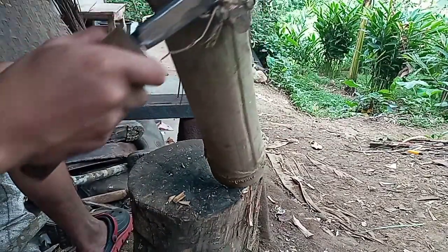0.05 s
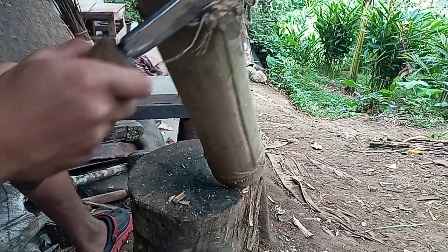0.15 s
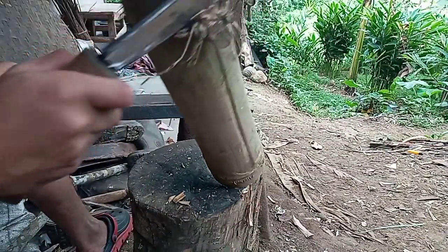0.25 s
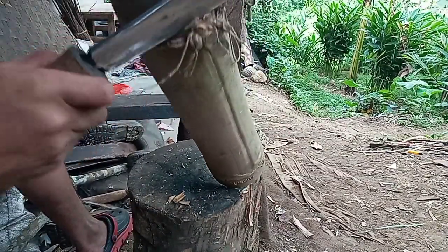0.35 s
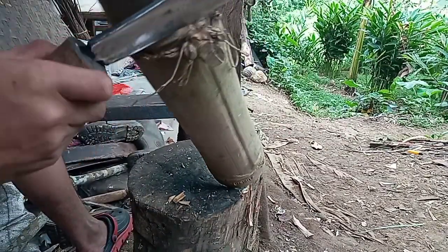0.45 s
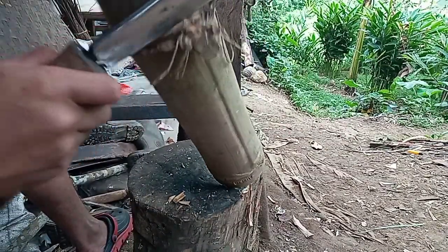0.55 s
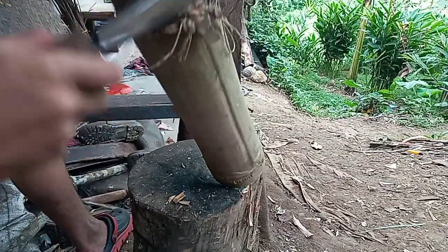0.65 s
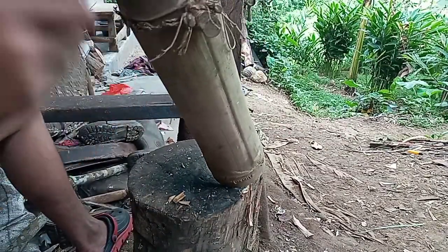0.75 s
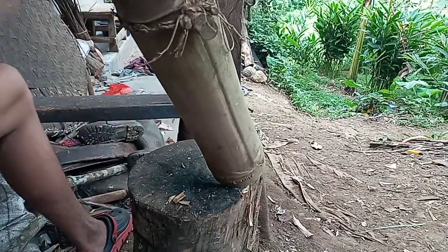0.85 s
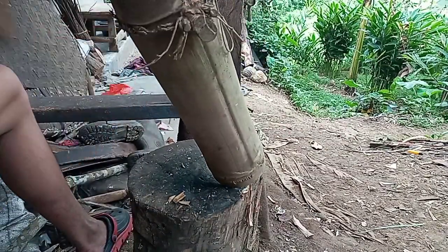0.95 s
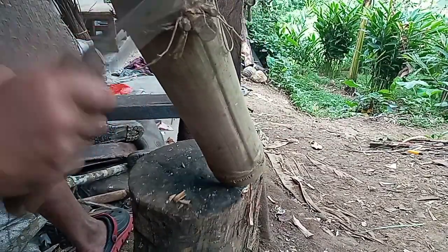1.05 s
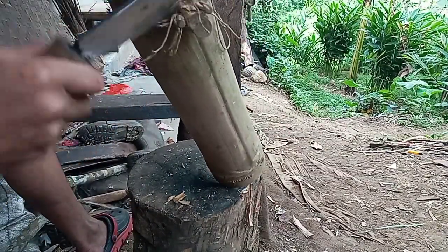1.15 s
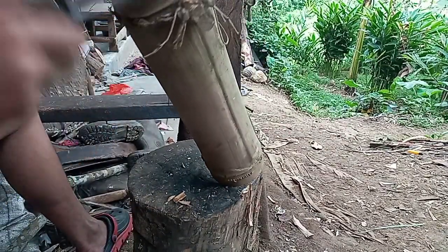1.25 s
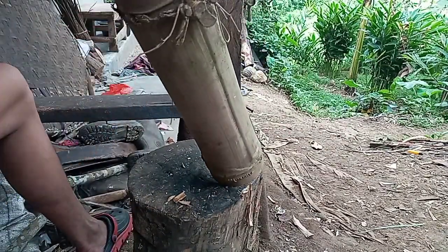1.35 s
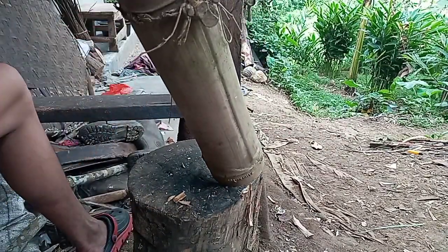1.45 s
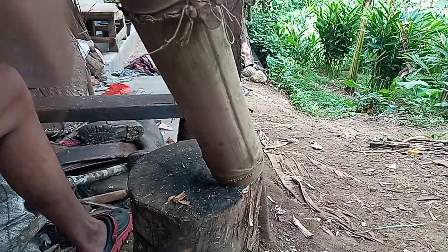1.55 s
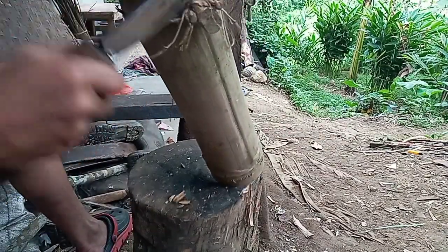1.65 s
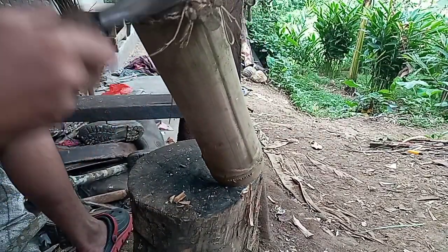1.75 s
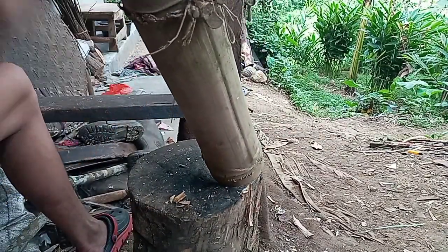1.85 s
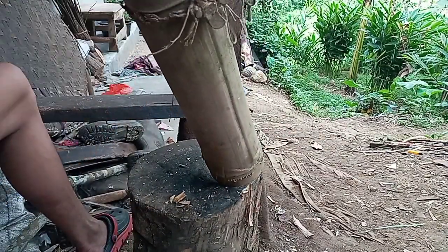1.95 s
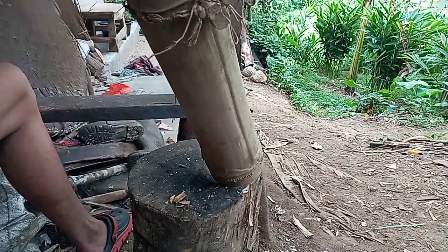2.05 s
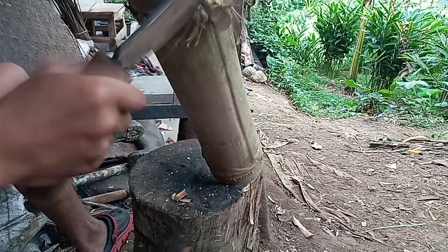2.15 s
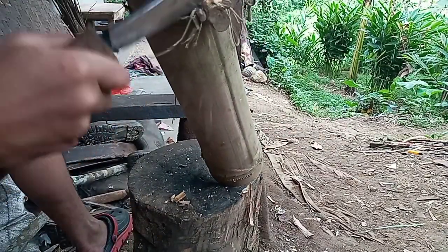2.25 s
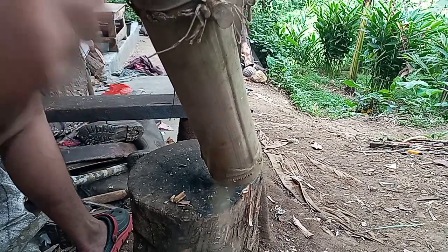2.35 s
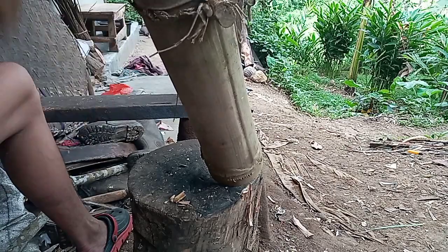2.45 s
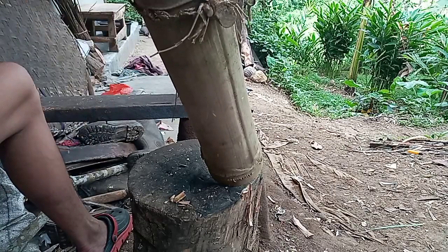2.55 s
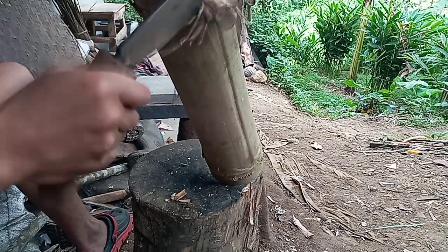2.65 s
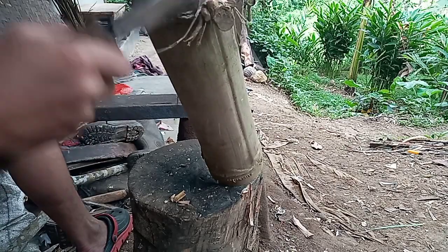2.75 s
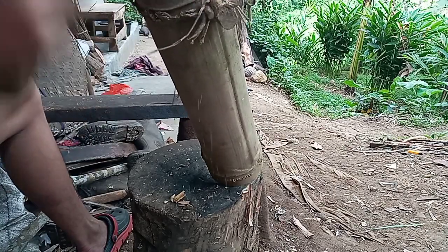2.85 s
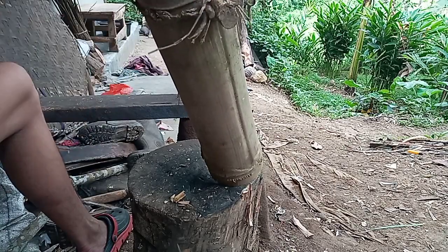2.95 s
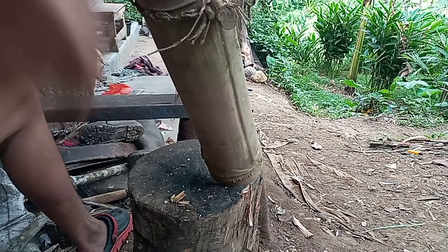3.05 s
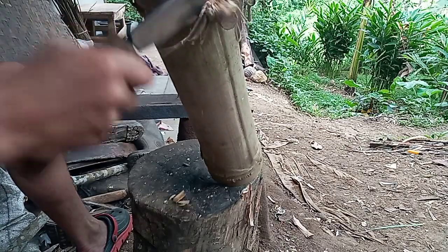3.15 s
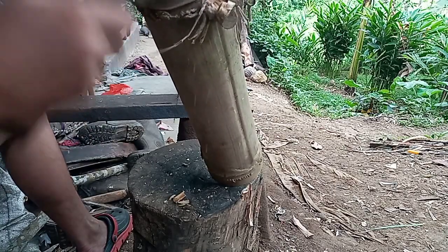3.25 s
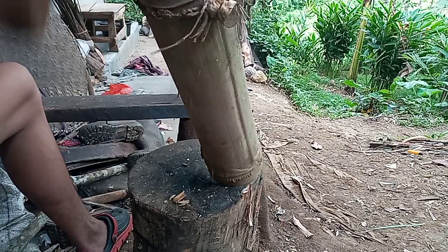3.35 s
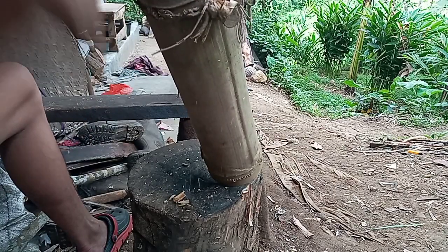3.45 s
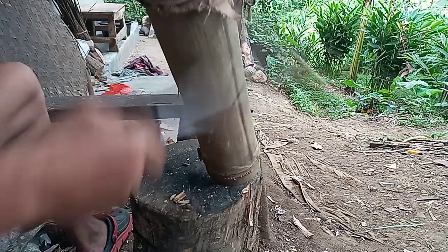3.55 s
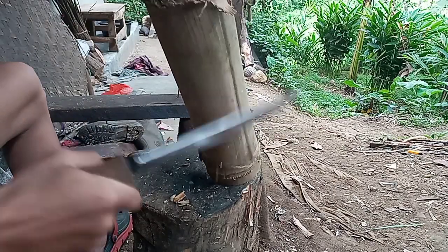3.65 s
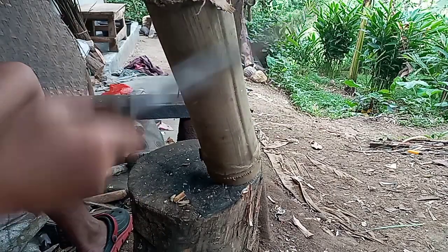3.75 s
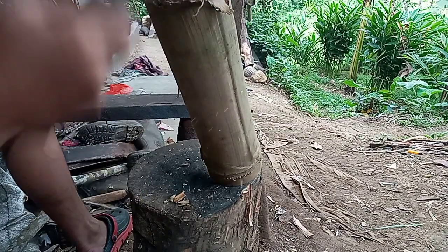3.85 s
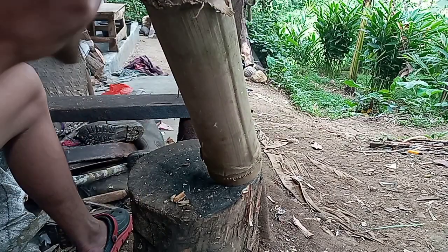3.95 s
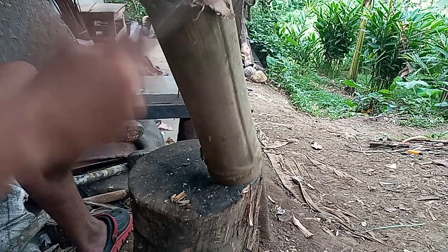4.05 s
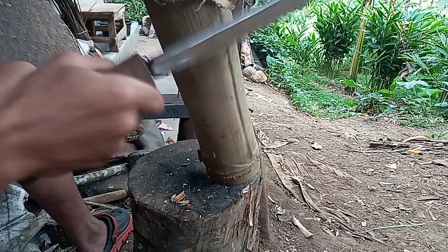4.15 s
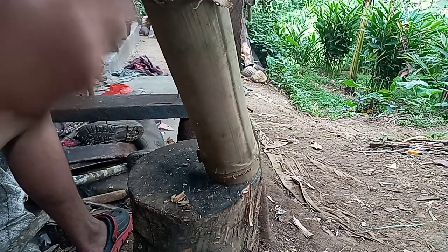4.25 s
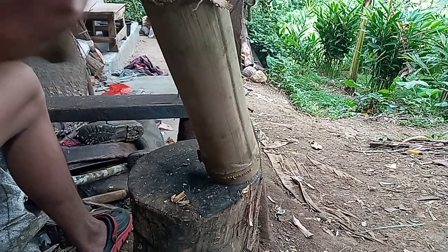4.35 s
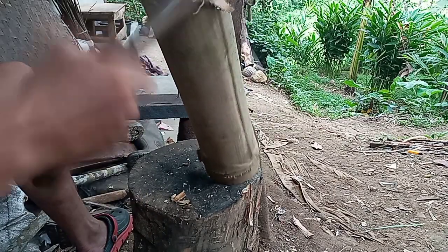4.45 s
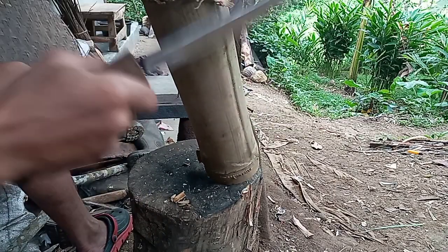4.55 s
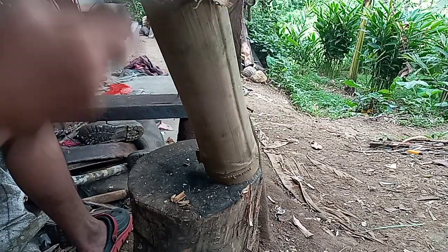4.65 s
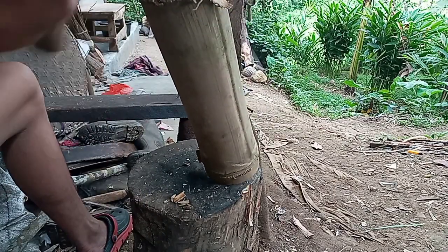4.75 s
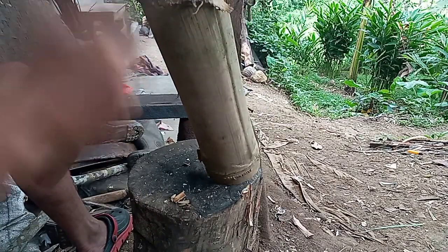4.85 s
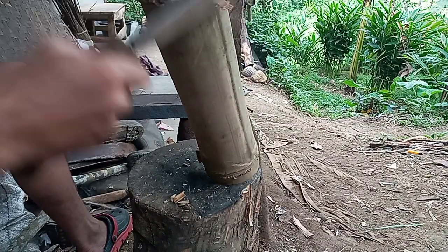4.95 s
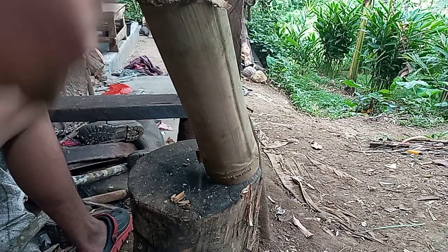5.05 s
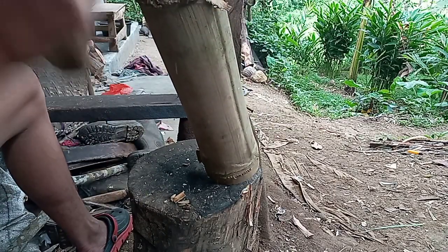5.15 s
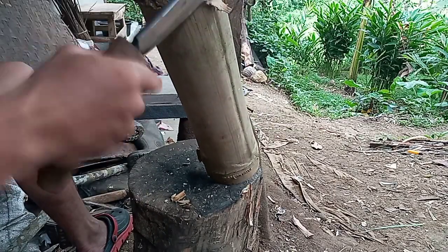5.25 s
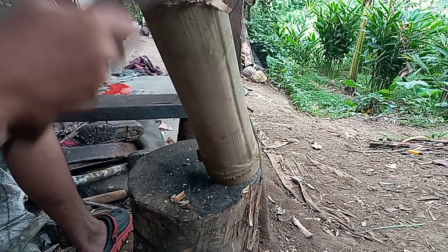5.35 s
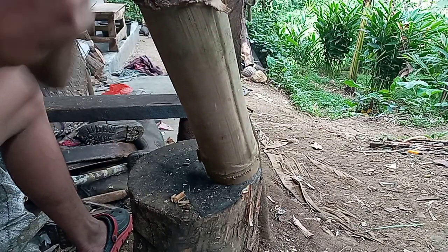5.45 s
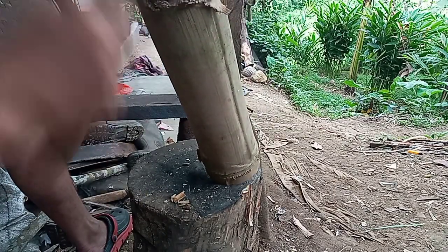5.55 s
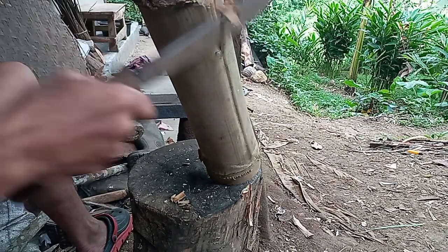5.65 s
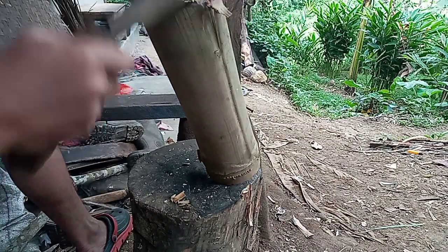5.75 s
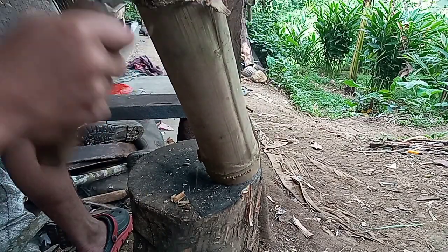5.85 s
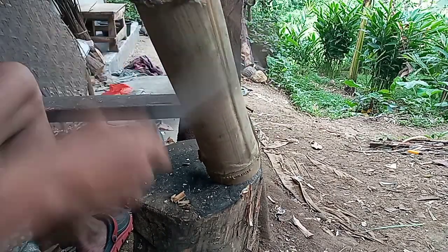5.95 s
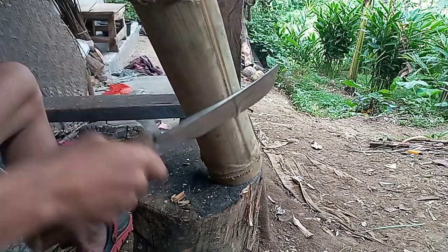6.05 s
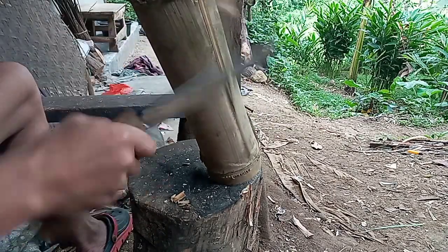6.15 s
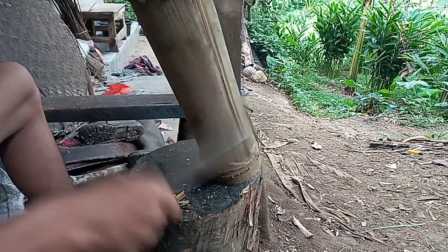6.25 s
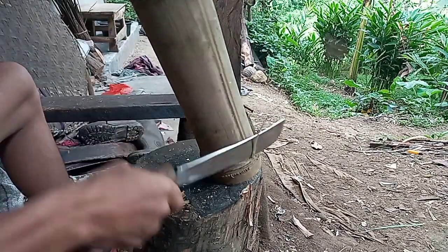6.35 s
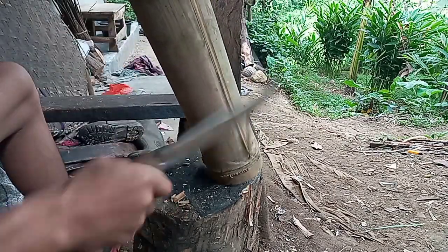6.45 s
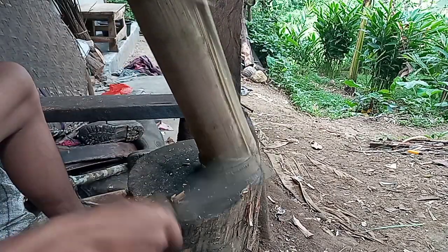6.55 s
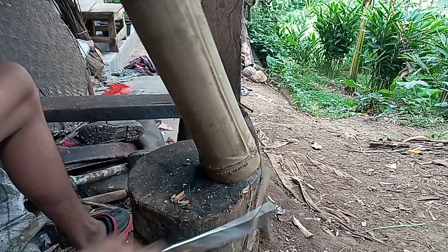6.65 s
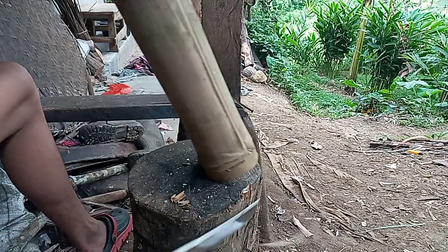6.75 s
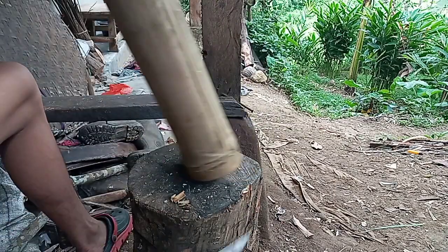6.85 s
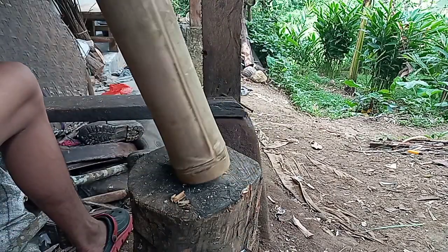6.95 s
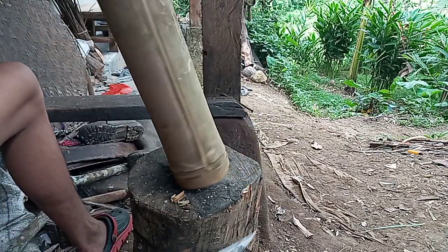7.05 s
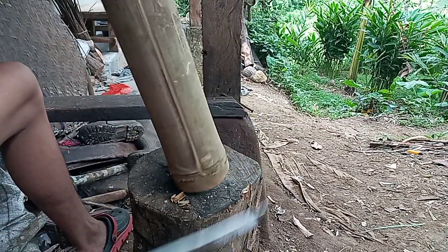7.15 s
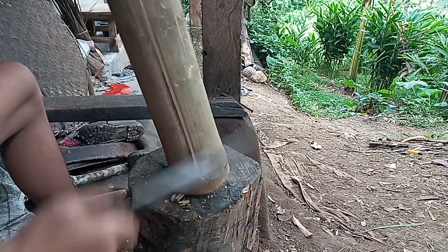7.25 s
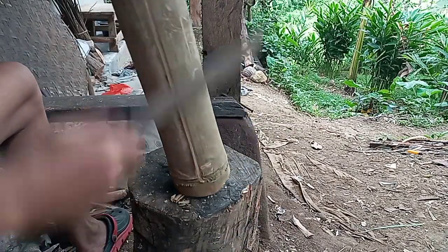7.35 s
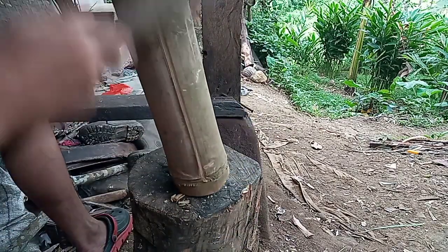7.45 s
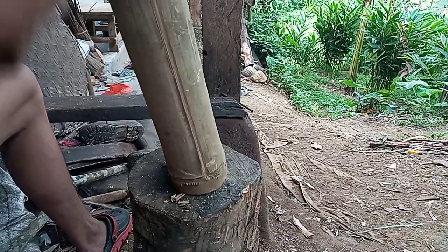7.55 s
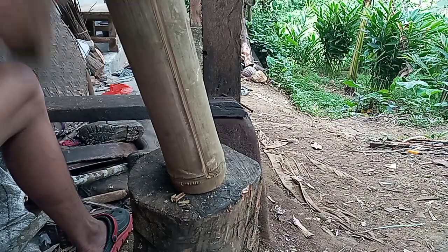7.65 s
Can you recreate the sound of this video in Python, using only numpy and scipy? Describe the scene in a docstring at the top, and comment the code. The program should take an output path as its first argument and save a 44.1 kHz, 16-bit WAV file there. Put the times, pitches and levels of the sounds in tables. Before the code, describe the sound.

A small motorbike putters past at a distance as a blade rasps faintly along bamboo. From about one second, hard chops land roughly every half second, each a bright crack with a short hollow knock and snapping fibres. Chips tick between them. Near the end the blows weaken into taps and scraping. Close stereo microphones outdoors beside an open shed, with short faint echoes and steady insect hiss.

```python
"""First a small motorbike and hissing insects, then a machete chopping into hollow bamboo close by.
The stalk stands on a stump beside an open shed: each blow drives its modes and snaps fibres, strokes rasp along it
and chips tick. Shed and trees answer with scattered noise echoes. The bike, multiples of its firing rate, drones away;
insects, thin far calls, hum and leaves are filtered noise. Two microphones of unlike colour hear it all."""
import sys
import numpy as np
from scipy import signal
from scipy.fft import rfft, irfft
from scipy.io import wavfile

SR = 44100
rng = np.random.default_rng(int(sys.argv[2]) if len(sys.argv) > 2 else 0)


def transcribe(signal):
    """Save signal, clipped to [-1, 1], as a 16-bit WAV file at the path in sys.argv[1]."""
    frames = np.atleast_2d(signal).T
    limited = np.clip(frames, -1, 1)
    pcm = np.round(limited * 32767).astype(np.int16)
    wavfile.write(sys.argv[1], SR, pcm)


def gain_from_db(level_db):
    """Convert decibel levels to linear amplitude factors (20 dB per decade)."""
    decades = np.asarray(level_db, float) / 20
    return 10 ** decades


N = 340011

# Close: blade meets stalk [t/s, crack level/dB, then level/dB of air column, wall, low fibre, high fibre]
BLOWS = [(0.209, -41.5, -70, -49, -29, -45), (1.0716, -9, -20, -15, -17, -15),
         (1.1185, -19.5, -35.5, -52, -35.5, -35.5), (1.6185, -3, -14.5, -16.5, -17, -10),
         (2.137, -1.5, -31.5, -21, -10, -9), (2.6418, -1, -15, -10, -17.5, -23),
         (3.0849, -13.5, -51.5, -15, -20, -18.5), (3.1014, -4, -18.5, -10, -14.5, -17.5),
         (3.528, -4, -26.5, -18, -15, -15.5), (3.809, -20, -54, -41, -37, -42.5),
         (4.0846, -3, -23.5, -24.5, -20, -16), (4.4823, -6, -39, -25.5, -23.5, -14.5),
         (4.874, -1, -18.5, -13.5, -14.5, -12), (5.24, 0, -20, -14.5, -13.5, -10.5),
         (5.5883, -3, -31.5, -20, -19, -14), (5.913, -10.5, -29.5, -53, -17, -17.5),
         (5.952, -14.5, -51, -24.5, -27.5, -23.5), (6.266, -20, -68, -28.5, -16, -35),
         (6.3584, -20, -61, -35.5, -36.5, -53), (6.5266, -11.5, -60, -28, -16.5, -35),
         (6.58, -18.5, -44, -28, -50, -55), (6.727, -23.5, -61, -38, -17.5, -75),
         (6.8615, -29.5, -45, -35.5, -31, -59)]
# Where air column, wall, low fibre, high fibre and crack strengths of a blow apply [f/Hz]
STRIKE_HZ = [620, 1125, 1650, 2550, 5500]
# Ringing modes of the stalk [f/Hz, level/dB, t60/s]
STALK_MODES = [(623, -1, .11), (850, -10, .04), (985, -8, .04), (1123, 0, .055), (1320, -8, .035),
               (1590, -2, .032), (1812, -2, .04), (1900, -4, .035), (2120, -1, .04), (2430, -2, .035),
               (2580, -2, .035), (2761, -1, .045), (2950, -3, .035)]
# Spectrum of snapping fibres [f/Hz, level/dB per Hz]
CRACK_SPECTRUM = [(1470, -29), (2500, 11), (2880, 2), (3320, 4.5), (4400, 4), (5790, -1), (6890, 8),
                  (8120, -8), (10500, -3.5), (13000, -18), (15200, -12.5), (16300, -41)]
# Blade and hand sliding on the stalk [start t/s, length/s, then level/dB of rasp, wall ring, fibre ring]
STROKES = [(0.0, .1, -44.5, -52, -53), (0.201, .38, -41, -63, -42), (0.586, 0.1, -44, -63, -52),
           (0.707, 0.087, -43, -75, -48.5), (1.021, .09, -54, -75, -51.5), (2.13, 0.022, -33.5, -80, -59.5),
           (2.486, 0.19, -53, -79.5, -63.5), (3.385, 0.099, -51, -85, -72), (3.761, 0.06, -46, -58, -45),
           (3.843, 0.055, -33, -77, -36), (3.92, .16, -53, -85, -68), (4.074, 0.049, -39.5, -79.5, -53),
           (5.572, 0.036, -38, -80, -52), (5.924, .08, -36.5, -41, -37), (5.996, 0.041, -26.5, -64, -46),
           (6.135, 0.14, -38, -46, -49), (6.27, 0.053, -31.5, -33.5, -39.5), (6.292, 0.05, -30, -50, -45.5),
           (6.358, 0.038, -54, -64, -77), (6.57, 0.086, -32.5, -39, -40), (6.726, .04, -47, -80, -34),
           (6.76, .16, -37.5, -80, -55), (6.828, .12, -32.5, -61, -51), (6.88, 0.12, -31, -55, -49.5),
           (6.995, .12, -41.5, -75, -65.5), (7.404, .1, -51.5, -59, -65)]
# Spectrum of the sliding rasp [f/Hz, level/dB per Hz]
RASP_SPECTRUM = [(1180, -39), (2000, -13), (3130, -3), (3480, -4), (4150, -5), (4550, 1), (4950, -8),
                 (5350, -5), (6900, -2), (8300, -9.5), (13700, -16), (15000, -13), (15900, -11.5),
                 (16300, -61)]
# The stalk's foot bumps the stump [f/Hz, level below the crack/dB]
STUMP_MODES = [(112, -32.5), (232, -25.5)]
# Chips and splinters ticking [t/s, level/dB]
TICKS = [(0.412, -30), (0.7348, -34.5), (1.182, -29.5), (1.2069, -29), (1.3804, -37.5), (1.5638, -38.5),
         (2.4949, -33.5), (2.5678, -32.5), (2.913, -36.5), (2.935, -39), (3.0597, -28), (3.1773, -28.5),
         (3.3214, -33), (3.3878, -25.5), (3.4267, -28.5), (3.7949, -31.5), (3.8205, -18), (3.8467, -28),
         (3.8689, -29), (3.9033, -27), (3.9494, -35.5), (4.0221, -29.5), (4.0436, -33), (4.743, -39),
         (4.79, -40), (5.0745, -35), (5.189, -29.5), (5.2948, -21.5), (5.418, -25.5), (5.5528, -24),
         (5.6874, -25.5), (5.7064, -23.5), (5.9394, -25), (5.9753, -19.5), (6.1363, -26), (6.2039, -25.5),
         (6.6784, -27), (6.304, -12), (7.0394, -32), (7.3423, -38.5)]
# Spectrum of one tick [f/Hz, level/dB per Hz]
TICK_SPECTRUM = [(880, -81), (1500, -29.5), (3020, -16), (4830, -12.5), (6520, -2), (8710, -10),
                 (14900, -19.5), (16300, -26.5)]
# Echoes off shed and trees [t after the blow/s, level/dB]
ECHO_DECAY = [(.008, -39), (0.036, -51), (0.091, -54), (.125, -56), (.135, -59), (.2, -68), (0.299, -81),
              (.5, -94.5)]
# Colour of the echoes [f/Hz, level/dB, further loss/(dB per s)]
ECHO_COLOUR = [(270, 8.5, 24.5), (605, -5.5, 72), (800, -8, 43.5), (1500, 4.5, 41.5), (2710, -2, 4),
               (5025, 1.5, -11), (7600, 0, 10), (9890, -7, 194), (14820, 8, 178)]
# Motorbike speed [t/s, firings per s]
BIKE_SPEED = [(0, 27.2), (.2, 27.4), (.57, 29.4), (.78, 30.8), (1.0, 32.6), (1.4, 33.6), (1.47, 31),
              (2.0, 26.8), (2.9, 26.3), (3.3, 29.5), (3.8, 29), (4.1, 30.7), (5.05, 28)]
# How unevenly the motorbike fires [t/s, roughness 0-1]
BIKE_ROUGHNESS = [(0, .06), (1.4, .12), (1.5, .35), (3.1, .6), (5.0, .5), (5.2, .85)]
# Motorbike as it reaches the shed [t/s, level/dB]
BIKE_LEVEL = [(0, -39), (.29, -33), (.62, -37), (1.4, -39.5), (1.5, -45), (2.0, -38.5), (2.8, -44),
              (3.03, -50), (3.2, -36.5), (3.32, -48.5), (3.72, -48), (3.9, -72.5), (4.12, -45.5),
              (4.75, -46.5), (5.0, -38), (5.121, -63), (5.35, -43.5), (5.55, -60.5), (5.85, -79)]
# Response of the exhaust [f/Hz, level/dB]
EXHAUST = [(24, -68.5), (40, -30.5), (106, 3.5), (172, 3.5), (245, -2), (286, -44), (348, -25),
           (391, -21.5), (617, -22.5), (811, -29.5), (900, -28), (1170, -68.5), (1980, -120)]
# Thin far calls [start t/s, end t/s, f/Hz, level/dB]
CHIRRS = [(1.82, 1.9, 3200, -62), (1.88, 1.96, 2960, -62.5), (1.97, 2.07, 900, -76), (1.2, 1.5, 2100, -71),
          (4.3, 4.47, 1600, -74), (7.48, 7.52, 2990, -57.5), (7.55, 7.68, 3010, -60),
          (7.48, 7.7, 2900, -71)]
# Insect choirs all round [f/Hz, width/Hz, level/dB, flicker/dB (taken as 3 at most)]
INSECTS = [(4750, 250, -75, 3), (7200, 700, -65, 4), (10046, 1200, -52.5, 0), (15280, 900, -67, 3)]
# Far hum and leaves [f/Hz, level/dB per Hz]
AIR_SPECTRUM = [(15, -33.5), (25, 2), (97, 5.5), (712, -9.5), (3120, -7), (4090, -8.5), (4630, -2),
                (6700, -9.5), (7210, 7), (8360, -40), (9000, -16.5), (11700, -35), (19800, -120)]
# Level of hum and leaves, lower through the chopping [t/s, level/dB]
AIR_LEVEL = [(0, 3), (1.4, -2), (5.85, -3), (6.6, 1)]
# The two microphones differ [f/Hz, left over right level/dB]
LEFT_OVER_RIGHT = [(60, 4.5), (130, 3), (290, 1.5), (640, 4.0), (1410, 6.5), (3100, 5.5), (6820, 6.5),
                   (15000, -12.5)]

BITE_S, CRUSH_T60_S = 0.0016, 0.041   # the edge bites in; crushing after a hard blow dies by 60 dB
PRESS_SHARE, LIFT_SHARE = 0.12, 0.33   # shares of a stroke where full pressure starts and ends
LIFT_DB = 24   # loss at either end of a stroke
STUMP_CYCLES, STUMP_SPREAD_DB = 9.7, 4   # cycles to die by 60 dB; chance from blow to blow
TICK_PAN_DB, TICK_PAN_SPREAD_DB = 3.5, 4.5   # left over right
MAX_SNAPS, SPLINTERS_PER_S = 24, 40   # small snaps under a stroke: upper limits
SPLINTER_DB, SPLINTER_SPREAD_DB = 3, 3   # over the stroke's rasp
TURN_S, NEAREST_S = 1.45, .35   # the bike turns away; it passes nearest
RATTLE_DB, BOOM_DB = (4.5, -7), (-6, 11)   # (before, after the turn), ahead of the two drifts below
RATTLE_LOSS_DB_PER_S = 2.5   # the rattle is clearest as the bike passes nearest
BOOM_GAIN_DB_PER_S = 2.5   # the boom stands out more as the bike recedes
ORDER_WANDER_DB = 3   # each multiple swells and sinks on its own
BIKE_STEP = 20   # samples per step of the bike's slower clock
AIR_DB = -57   # ahead of AIR_LEVEL
LEFT_LAG, BIKE_LEFT_LAG = 45, 32   # samples


def rms_one(x):
    """Scale to rms 1."""
    return x / np.sqrt(np.mean(x ** 2) + 1e-20)


def in_time(rows):
    """The value column of a time curve at every sample."""
    s, value = np.transpose(rows)
    return np.interp(np.arange(N) / SR, s, value)


def at_hz(points, hz, axis=1):
    """Read a spectrum on a log-frequency axis."""
    points = np.array(points)
    return np.interp(np.log(hz), np.log(points[:, 0]), points[:, axis])


def colour(x, spectrum):
    """Causal filter with the given spectrum (minimum phase by folding the cepstrum)."""
    hz = np.maximum(np.arange(2049) * SR / 4096, 1)
    cepstrum = irfft(np.log(gain_from_db(at_hz(spectrum, hz))))
    cepstrum[1:2048] *= 2
    cepstrum[2049:] = 0
    response = irfft(np.exp(rfft(cepstrum)))
    response = response.reshape((1,) * (x.ndim - 1) + (-1,))
    return signal.oaconvolve(x, response, axes=-1)[..., :N]


def band_noise(order, low_hz, high_hz, length):
    """Stereo noise, unrelated on the two sides, kept to one band."""
    band = signal.butter(order, [low_hz, high_hz], "band", fs=SR, output="sos")
    return signal.sosfilt(band, rng.standard_normal((2, length)))


def drift(rate_hz):
    """Slow chance of spread 1, low-passed at rate_hz on a clock of 40 samples."""
    r = np.exp(-80 * np.pi * rate_hz / SR)
    noise = rng.standard_normal(N // 40 + 2002)
    slow = signal.lfilter([1], [1, -2 * r, r * r], noise)[2000:]
    return np.interp(np.arange(N) / 40, np.arange(len(slow)), rms_one(slow))


def ring(force, hz, t60):
    """A resonator: a unit click sets a sine of height 1 ringing."""
    r, w = gain_from_db(-60 / (t60 * SR)), 2 * np.pi * hz / SR
    return signal.lfilter([0, np.sin(w)], [1, -2 * r * np.cos(w), r * r], force + 1e-18)


def grains(spread_db, alike):
    """Stereo noise of uneven grains, partly shared by both sides; rms 1."""
    unevenness = np.minimum(rng.exponential(1, N), 4)
    mid, side = rng.standard_normal((2, N)) * gain_from_db(spread_db * unevenness)
    return rms_one(np.sqrt(1 + alike) * mid + np.sqrt(1 - alike) * side * [[1], [-1]])


def bursts(times, db, rise_s, t60):
    """Envelope: at each time a short rise and an exponential fall."""
    out, t = np.zeros(N), np.arange(int(.12 * SR)) / SR
    for s, level_db, fall_s in np.broadcast(times, db, t60):
        at = round(s * SR)
        out[at:at + len(t)] += np.minimum(t / rise_s, 1) * gain_from_db(level_db - 60 * t / fall_s)
    return out


def lag_left(x, lag):
    """Sound from the right reaches the left microphone later."""
    return np.array([np.r_[np.zeros(lag), x[0, :-lag]], x[1]])


def pressure_db(share):
    """A stroke presses on, holds and eases off; share 0-1 of its length."""
    return np.interp(share, [0, PRESS_SHARE, LIFT_SHARE, 1], [-LIFT_DB, 0, 0, -LIFT_DB])


def sliding_envelopes():
    """The stroke's pressure sets how hard it rasps and how hard it rubs wall and fibre."""
    sliding = np.zeros((3, N))
    for start, length, *layer_db in STROKES:
        at, share = round(start * SR), np.linspace(0, 1, round(length * SR))
        level = gain_from_db(np.add.outer(layer_db, pressure_db(share)))
        sliding[:, at:at + len(share)] += level * signal.windows.tukey(len(share), .1)
    return sliding


def blows_and_scrapes():
    """The blade's bite and the crushing fibres drive the stalk's modes; crack and rasp also sound directly."""
    s, crack_db, *low_db = np.transpose(BLOWS)
    strengths = np.transpose([*low_db, crack_db])
    rasp, wall, fibre = sliding_envelopes()
    # light taps crush few fibres and end sooner
    crush_s = CRUSH_T60_S * np.clip(1.5 + crack_db / 28, .3, 1)
    crush = grains(spread_db=5.0, alike=0.087)
    out = rms_one(colour(crush, CRACK_SPECTRUM)) * bursts(s, crack_db, BITE_S, crush_s)
    catch_and_slip = gain_from_db(3 * drift(90))
    out += rms_one(colour(grains(spread_db=3.0, alike=.5), RASP_SPECTRUM)) * rasp * catch_and_slip
    for hz, level_db, t60 in STALK_MODES:
        strength_db = [np.interp(np.log(hz), np.log(STRIKE_HZ), row) for row in strengths]
        blow_db = level_db + np.array(strength_db)
        # no two blows land alike
        late, spot = rng.random((len(s), 2)).T
        bite = np.zeros(N)
        bite[((s + .001 + .004 * late) * SR).astype(int)] = gain_from_db(blow_db + 4 * (spot - .5) + 3)
        # the push lasts a few cycles, so low modes bloom later
        swell_s = 9 / hz
        push = ring(bite, hz, swell_s) * 2 * np.log(1000) / (swell_s * SR)
        crushing = bursts(s, blow_db - 20.5, BITE_S, 0.82 * crush_s)
        rub = wall if 1000 < hz < 1250 else fibre * gain_from_db(-5) * (1400 < hz < 2300)
        # a longer ring gathers more of the rubbing, so it is evened out
        crushing += rub * gain_from_db(level_db) / np.sqrt(SR * t60 / 4 / np.log(1000))
        out += ring(push + crush * crushing, hz, t60)
    return out


def thuds():
    """Every blow bumps the stalk's foot on the stump: dull decaying sines, a few cycles long."""
    out, t = np.zeros(N), np.arange(int(.1 * SR)) / SR
    chance = rng.standard_normal((len(BLOWS), len(STUMP_MODES)))
    for (s, crack_db, *_), luck in zip(BLOWS, chance):
        at = round(s * SR)
        for (hz, db), lucky in zip(STUMP_MODES, luck):
            level_db = crack_db + db + STUMP_SPREAD_DB * lucky
            fall_db = 60 * hz * t / STUMP_CYCLES
            out[at:at + len(t)] += gain_from_db(level_db - fall_db) * np.sin(2 * np.pi * hz * t)
    return out


def ticks():
    """Each chip, or splinter under a stroke, is a few milliseconds of bright crackle."""
    start, length, rasp_db = np.transpose(STROKES)[:3, :, None]
    share, size = rng.random((2, len(STROKES), MAX_SNAPS))
    snaps = np.arange(MAX_SNAPS) + 1 < SPLINTERS_PER_S * length
    snap_s = start + share * length
    snap_db = rasp_db + pressure_db(share) + SPLINTER_DB - SPLINTER_SPREAD_DB * np.log(size + 0.13)
    s, db = np.c_[np.transpose(TICKS), [snap_s[snaps], snap_db[snaps]]]
    pan_db = TICK_PAN_DB + TICK_PAN_SPREAD_DB * rng.standard_normal(len(s))
    shape = np.array([bursts(s, db + side * pan_db / 2, 0.00025, 0.015) for side in (1, -1)])
    return rms_one(colour(grains(spread_db=-11.0, alike=0.12), TICK_SPECTRUM)) * shape


def echoes(x):
    """Scattered reflections, unrelated on the two sides, each band fading at its own pace."""
    s, db = np.transpose(ECHO_DECAY)
    t = np.arange(int(s[-1] * SR)) / SR
    edges, response = 200 * 2 ** np.arange(0, 6.6, .5), 0   # half-octave bands
    for low, high in zip(edges, edges[1:]):
        hz = np.sqrt(low * high)
        band_db = at_hz(ECHO_COLOUR, hz) - t * at_hz(ECHO_COLOUR, hz, axis=2)
        response = response + band_noise(2, low, high, len(t)) * gain_from_db(band_db)
    response = response * gain_from_db(np.interp(t, s, db)) * (t > s[0])
    return signal.oaconvolve(x, response, axes=-1)[:, :N]


def motorbike():
    """Multiples of the firing rate through the exhaust; uneven firing blurs each one, the high ones most."""
    per_s, rough, db = [in_time(rows)[::BIKE_STEP] for rows in (BIKE_SPEED, BIKE_ROUGHNESS, BIKE_LEVEL)]
    t = np.arange(len(db)) * BIKE_STEP / SR
    since = t - TURN_S
    rattle_db = np.interp(since, [-.05, .05], RATTLE_DB) - RATTLE_LOSS_DB_PER_S * np.abs(t - NEAREST_S)
    boom_db = np.interp(since, [-.05, .05], BOOM_DB) + BOOM_GAIN_DB_PER_S * np.maximum(since, 0)
    phase = 2 * np.pi * np.cumsum(per_s) * BIKE_STEP / SR
    blur = signal.butter(2, 13, fs=SR / BIKE_STEP, output="sos")
    sound, power = 0, 0
    for k in range(2, 27):
        hz = k * per_s
        rattle_share = np.clip(hz / 50 - 5.5, 0, 1)   # comes in around 300 Hz
        gain_db = at_hz(EXHAUST, hz) + rattle_db * rattle_share + boom_db * (k == 3)
        gain = gain_from_db(gain_db + ORDER_WANDER_DB * drift(1.7)[::BIKE_STEP])
        share = np.clip(rough + (k - 8) / 12 * (k > 8), 0, 1)
        real, imaginary = rms_one(signal.sosfilt(blur, rng.standard_normal((2, 3, len(t)))))
        uneven = (real + 1j * imaginary) / np.sqrt(2)
        uneven = .9 * uneven[0] + .4 * uneven[1:]   # mostly the same at both microphones
        steady_and_uneven = np.sqrt(1 - share) + np.sqrt(share) * uneven
        sound = sound + gain * np.real(steady_and_uneven * np.exp(1j * (k * phase - 0.081 * k * k)))
        power = power + gain ** 2 / 2
    fade = np.clip((BIKE_LEVEL[-1][0] + .1 - t) / .1, 0, 1)
    levelled = sound / np.sqrt(power) * gain_from_db(db) * fade
    return lag_left(signal.resample_poly(levelled, BIKE_STEP, 1, axis=1)[:, :N], BIKE_LEFT_LAG)


def chirrs():
    """Thin far calls: narrow noise that swells and dies."""
    out = np.zeros((2, N))
    for start, end, hz, db in CHIRRS:
        a, b = round(start * SR), round(end * SR)
        call = rms_one(band_noise(2, hz - 50, hz + 50, b - a))
        out[:, a:b] += call * gain_from_db(db) * signal.windows.tukey(b - a, .4)
    return out


def insects():
    """Each choir is a steep band of noise, steady or flickering a little."""
    out = np.zeros((2, N))
    for hz, width_hz, db, flicker_db in INSECTS:
        choir = rms_one(band_noise(3, hz - width_hz / 2, hz + width_hz / 2, N))
        out += choir * gain_from_db(db + np.clip(flicker_db, 0, 3) * drift(10))
    return out


def hum_and_leaves():
    """Far hum and rustle: coloured noise whose level follows AIR_LEVEL."""
    noise = rms_one(colour(rng.standard_normal((2, N)), AIR_SPECTRUM))
    return noise * gain_from_db(AIR_DB + in_time(AIR_LEVEL))


def scene():
    """Near sounds with their echoes over the background."""
    near = blows_and_scrapes() + thuds() + ticks()
    background = motorbike() + chirrs() + insects() + hum_and_leaves()
    return lag_left(near, LEFT_LAG) + echoes(near) + background


def gain_control(x, knee_db, share, recover_db_per_s, attack_s):
    """Loud sounds pull the gain down a little; it creeps back afterwards."""
    level_db = 20 * np.log10(np.abs(x).max(axis=0) + 1e-6)
    slope = recover_db_per_s * np.arange(N) / SR
    held_db = np.maximum.accumulate(level_db + slope) - slope   # peaks held, sinking steadily
    cut_db = -share * np.maximum(held_db - knee_db, 0)
    r = np.exp(-1 / (attack_s * SR))
    return x * gain_from_db(signal.lfilter([1 - r], [1, -r], cut_db))


def top_cut(x):
    """Nothing passes above the cut-off."""
    return signal.sosfilt(signal.butter(12, 16490, fs=SR, output="sos"), x)


def record(dry):
    """Two unlike microphones; gain ducks after blows, the loudest overload the input, deepest bass is cut."""
    half = np.array(LEFT_OVER_RIGHT) * [1, .5]   # half the difference to each side
    heard = np.array([colour(dry[0], half), colour(dry[1], half * [1, -1])])
    heard = gain_control(heard, knee_db=-23.0, share=0.061, recover_db_per_s=33.0, attack_s=0.094)
    overloaded = np.clip(heard, -.95, .95)
    mix = signal.sosfilt(signal.butter(2, 60, "high", fs=SR, output="sos"), overloaded)
    return top_cut(mix)


dry = scene()
out = record(dry)
transcribe(out)
```